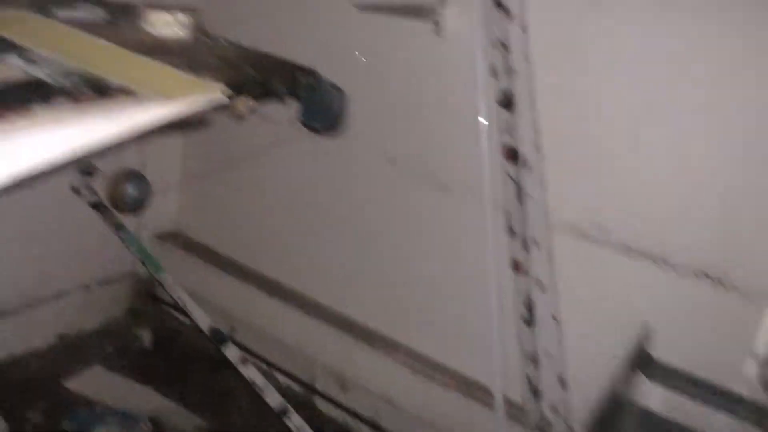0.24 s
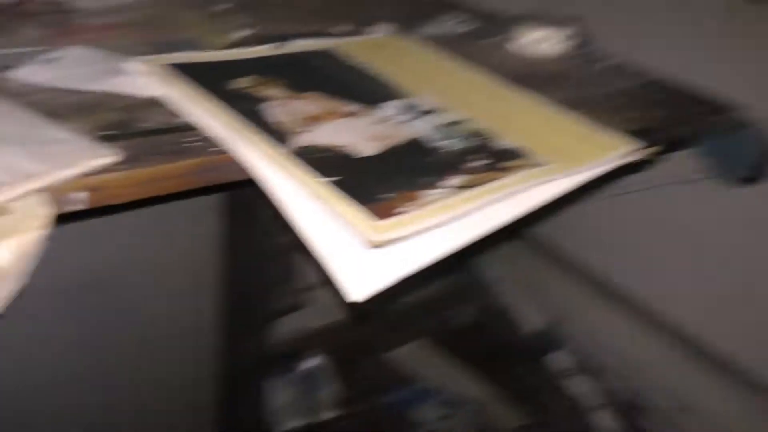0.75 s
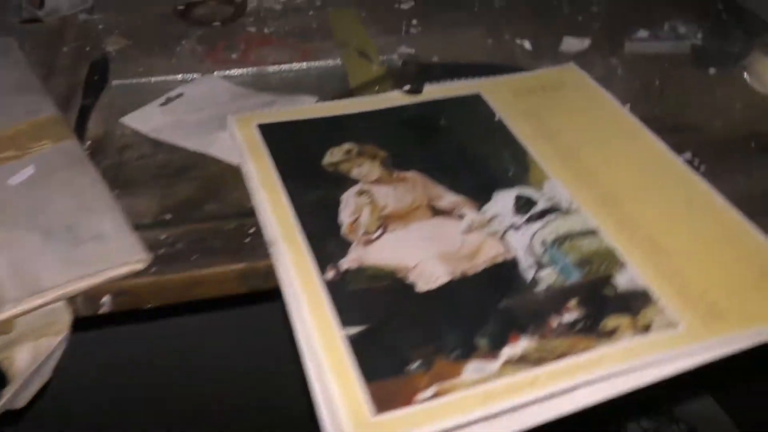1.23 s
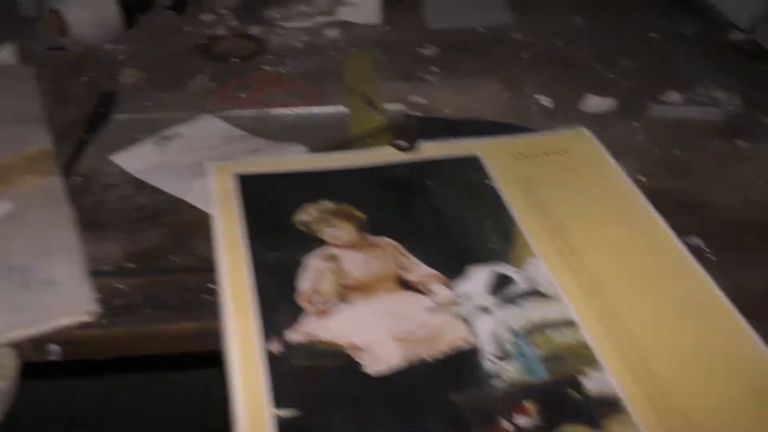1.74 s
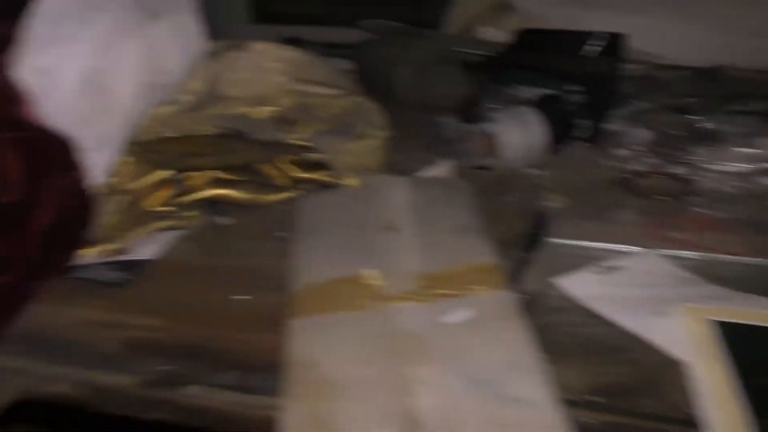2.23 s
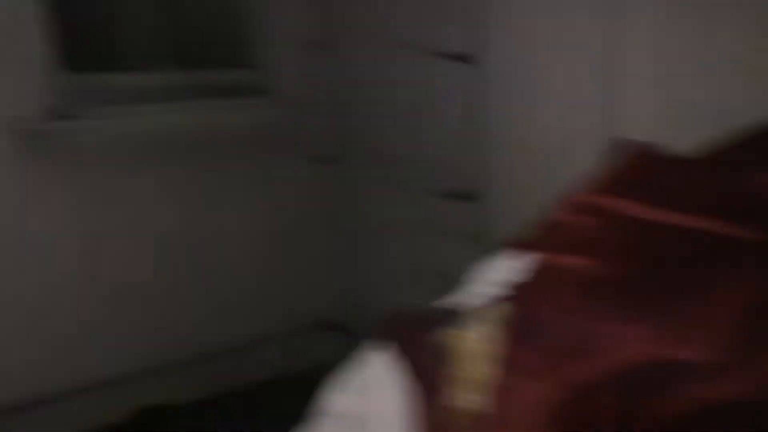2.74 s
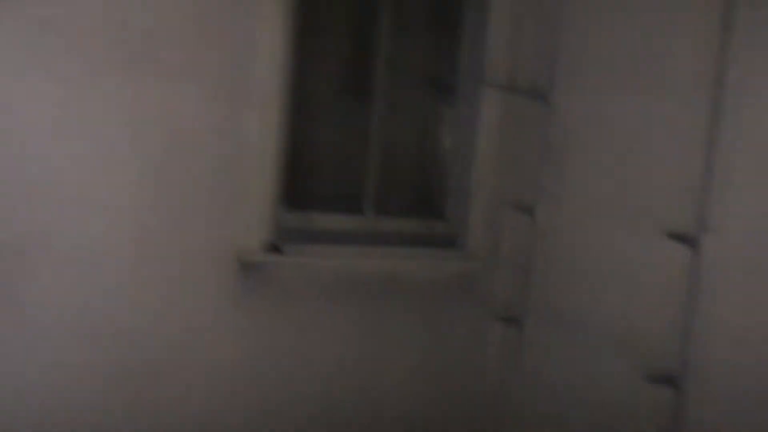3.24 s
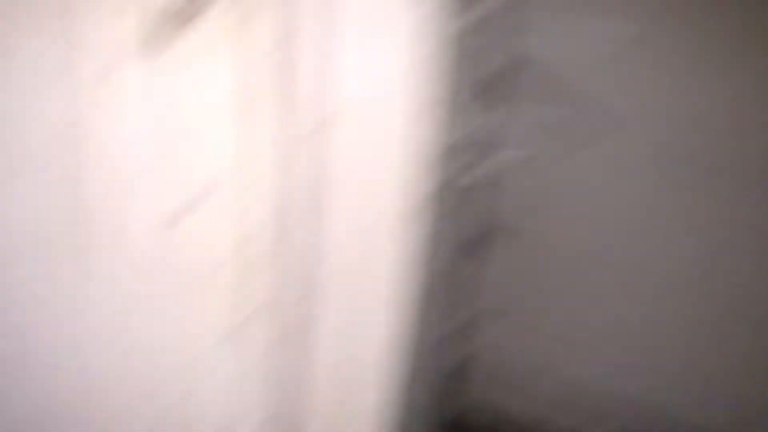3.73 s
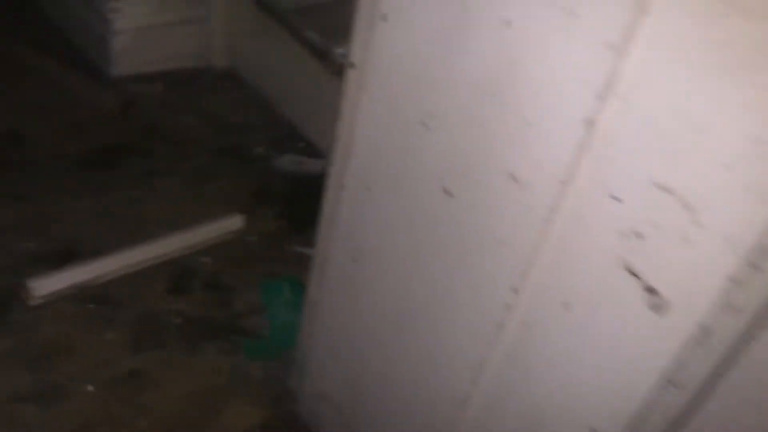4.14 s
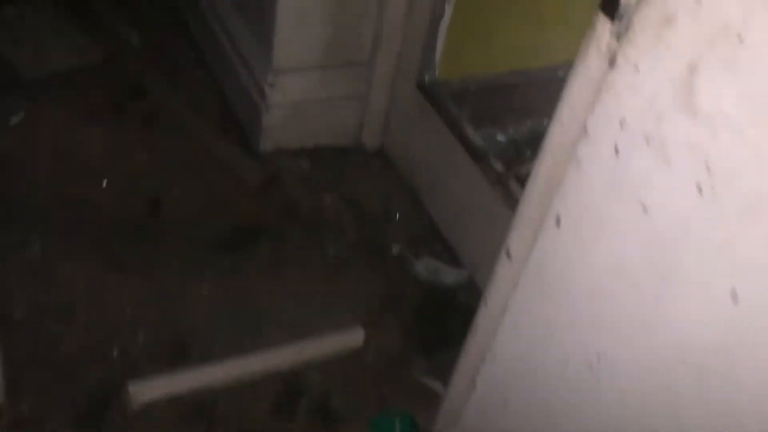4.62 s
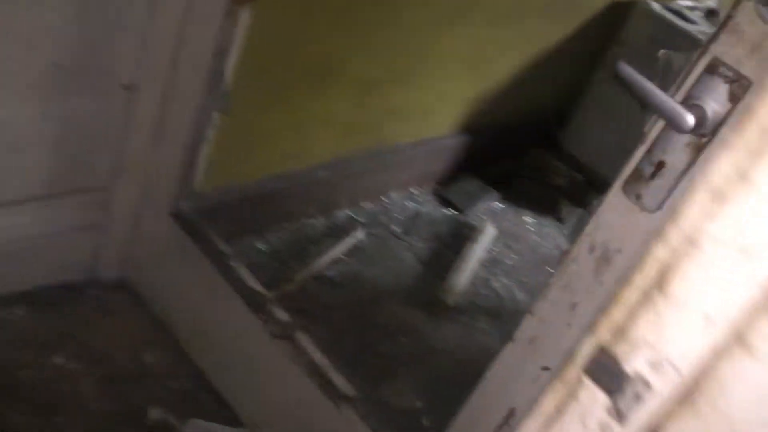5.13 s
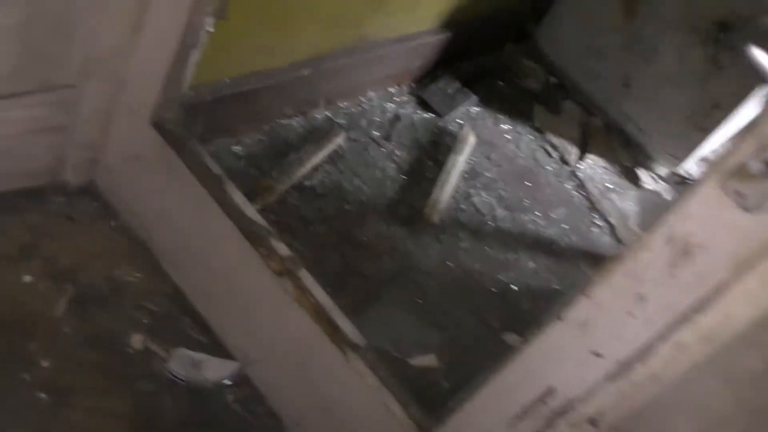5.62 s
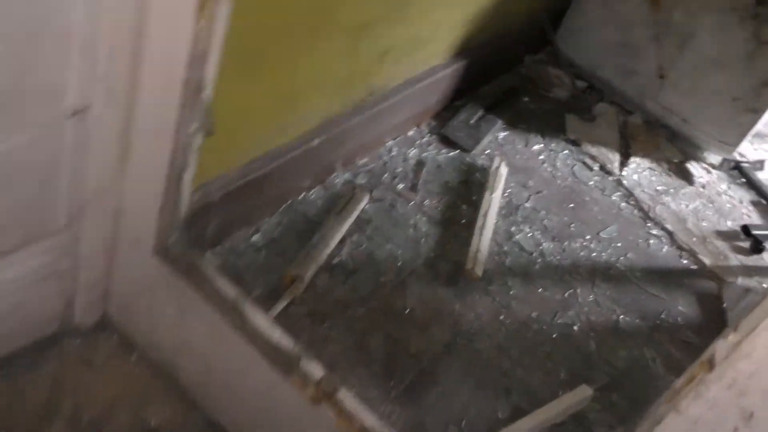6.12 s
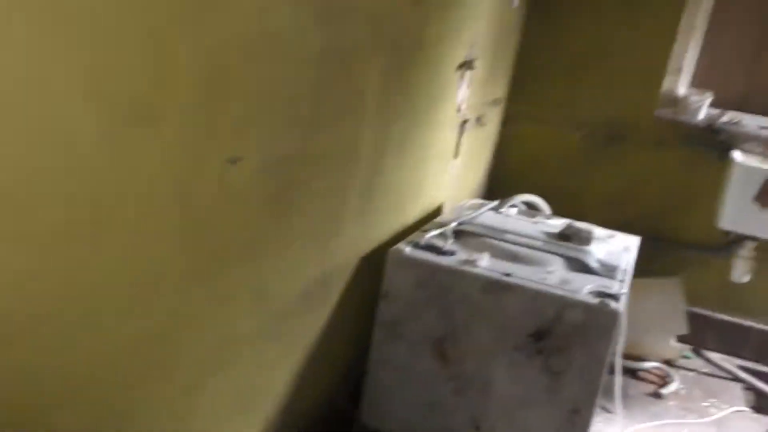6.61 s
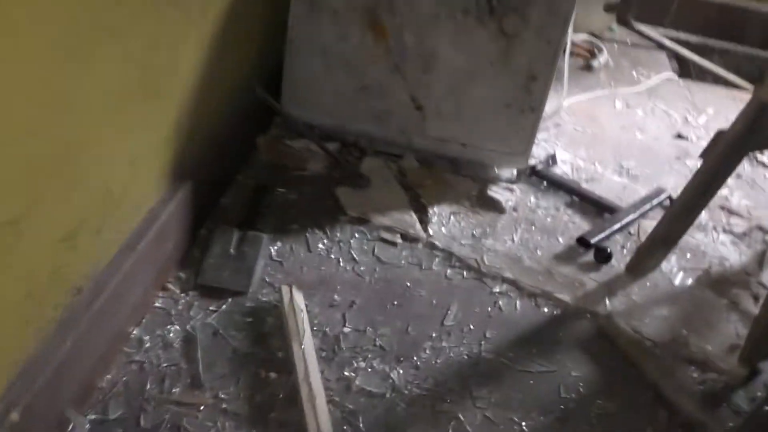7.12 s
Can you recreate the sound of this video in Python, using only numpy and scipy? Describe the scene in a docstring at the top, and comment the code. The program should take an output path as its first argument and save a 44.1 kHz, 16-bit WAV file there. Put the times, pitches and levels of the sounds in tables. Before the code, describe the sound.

In a bare, reverberant abandoned room, a few dull glass crunches sound further off, with faint clothing rustle, a bright cloth swipe and soft bumps on the handheld camera. After a quiet pause, glass begins to tick and scrape close to the stereo microphone, then snaps, grinds and clinks underfoot in a dense, bright crackle over a steady quiet hush.

```python
"""Broken glass grinds, snaps in quick bursts and clinks underfoot in the bare rooms of an abandoned house.
The holder of a hand-held camera crushes it close by: random clicks ring short, irregular modes.
Before that, someone crunches about further off, as duller filtered clicks with more room around them.
Cloth noise brushes the stereo microphone, knocks ring the camera case, air puffs at the ports,
and a steady coloured hush lies under it all."""
import sys
import numpy as np
from scipy import signal
from scipy.fft import rfft, irfft
from scipy.io import wavfile

SR = 44100
rng = np.random.default_rng(int(sys.argv[2]) if len(sys.argv) > 2 else 0)


def put_to_file(sound):
    """Save the sound as 16-bit audio at rate SR, in the file named by the first command-line argument."""
    columns = np.atleast_2d(sound).T  # one column per channel
    safe = np.clip(columns, -1, 1)
    whole_steps = np.round(safe * 32767)
    wavfile.write(sys.argv[1], SR, whole_steps.astype(np.int16))


N = 324576
TIME = np.arange(N) / SR
SHORT = TIME[:SR // 3]  # time axis of one brief sound

# Short snaps, ticks and knocks, mostly glass breaking close by, before a shared level trim.
# The burst length sets a bell-shaped fade; the note rings as a pair just below the listed pitch.
# (time [s], level [dB], burst length [s], centre of the snap [Hz], main note [Hz])
SNAPS_AND_TICKS = [(0.703, -41.5, 0.0035, 2500, 1240), (0.843, -40, .001, 2020, 1070),
                   (4.0477, -39, 0.0026, 1800, 1900), (4.969, -40.5, .009, 4000, 1820),
                   (5.006, -39.5, 0.0054, 3000, 1970), (5.075, -40.5, 0.0034, 9000, 11000),
                   (5.107, -42, .006, 3000, 1850), (5.183, -37, 0.027, 8000, 9100),
                   (5.214, -32.5, .012, 9000, 11700), (5.229, -37, 0.0028, 1430, 1710),
                   (5.2927, -26.5, 0.0018, 1470, 1540), (5.294, -29, 0.0072, 11300, 3610),
                   (5.448, -31, .008, 3000, 1120), (5.4576, -28, 0.0012, 1950, 2730),
                   (5.592, -37, 0.0036, 5000, 3500), (5.907, -29, 0.023, 1940, 13700),
                   (5.952, -30, 0.014, 3300, 4050), (6.044, -25.5, 0.0068, 3750, 4310),
                   (6.0761, -28.5, 0.011, 3480, 13600), (6.202, -23, .010, 5900, 5510),
                   (6.363, -28.5, 0.016, 7550, 6560), (6.4502, -21, 0.0069, 8500, 7200),
                   (6.4625, -21.5, 0.0025, 2320, 5920), (6.528, -30.5, 0.0089, 6000, 6250),
                   (6.559, -19, 0.0041, 6950, 9140), (6.606, -32, 0.021, 6760, 6900),
                   (6.8087, -20, 0.0063, 10500, 4080), (6.879, -30.5, 0.009, 8000, 4070),
                   (6.920, -26.5, 0.014, 8900, 3930), (6.979, -18.5, 0.01, 5200, 9800),
                   (7.041, -29.5, .007, 5000, 9860), (7.134, -23.5, 0.0019, 2780, 3840),
                   (7.175, -27, 0.013, 4000, 2280), (7.193, -23.5, .006, 9100, 9770),
                   (7.228, -22, 0.0065, 6740, 5410), (7.295, -35, .003, 1620, 1410)]
# Close: the holder's sole pressing on glass; the level steers both grit layers
# (start [s], end [s], level [dB])
SOLE_PRESSES = [(4.959, 5.505, -49), (5.923, 6.16, -38), (6.198, 6.407, -45.5), (6.503, 6.69, -42),
                (6.84, 6.946, -49), (6.95, 7.36, -34.5)]
# Tone of the coarse and the fine crushed glass: (frequency [Hz], relative level [dB])
COARSE_GRIT_TONE = [(200, 4.5), (600, -5), (1100, -0.5), (2200, 2.5), (3800, -8.5), (6000, -13.5),
                    (15000, -19)]
FINE_GRIT_TONE = [(1500, -13), (3500, 9), (5500, -1), (8000, 2.5), (11000, 1), (14000, -10), (16000, -23)]
# Close: a small loose piece that clinks: (mode [Hz], level [dB], decay by 60 dB [s])
SHARD_MODES = [(2570, 0, .1), (3200, -4, .12), (4400, -9, .08), (5220, -1, .14), (6218, 0, .3),
               (7750, -4, .14), (9470, -6, .08), (10480, -7, .14), (11980, -13, .1), (15350, -12, .1)]
# Short dull thuds, mostly the holder's treads: (time [s], level [dB])
SHORT_THUDS = [(0.844, -46.5), (4.048, -48), (4.944, -41), (5.226, -45), (5.457, -46.5), (6.08, -41.5),
               (6.462, -44.5), (6.965, -36.5), (7.18, -42.5)]
# Close: a shard dragged under the shoe: (start [s], end [s], level [dB])
SHARD_DRAGS = [(5.47, 5.62, -40), (5.608, 5.779, -44.5), (5.775, 5.867, -41.5)]
# Resonances of the dragged shard: (frequency [Hz], width [Hz], level [dB])
DRAG_RESONANCES = [(1117, 41, 0), (2640, 150, 0), (4310, 380, 3.5), (6200, 200, -5), (7060, 350, -8),
                   (9600, 400, 2.5), (11200, 500, -2), (13100, 700, -2)]
# Further off: steps on glass: (time [s], level [dB], fall [s], centre [Hz], thud of the boards [dB])
FAR_STEPS = [(0.088, -38, 0.023, 2000, -54), (0.653, -51, 0.0052, 1760, -57),
             (0.924, -28.5, 0.022, 3200, -46.5), (1.087, -25, 0.013, 2220, -38.5),
             (1.305, -43.5, 0.047, 2680, -60), (1.996, -45, 0.011, 9500, -68),
             (2.773, -27.5, 0.0096, 3200, -37), (2.985, -29.5, 0.014, 2330, -37.5),
             (3.05, -26.5, 0.039, 1980, -39), (4.046, -42, 0.011, 1730, -64)]
# Further off: a larger loose piece on the floor: (mode [Hz], level [dB], decay by 60 dB [s])
PANE_MODES = [(1670, -3, .06), (2150, -7, .05), (2480, -3, .07), (2910, -7, .05), (3660, -7, .1),
              (3990, -1, .1), (5215, -4, .28), (6540, -14, .1), (9810, -15, .12)]
# Further off: feet shifting: (start [s], end [s], level [dB])
FOOT_SHUFFLES = [(0.0, 0.09, -54), (0.27, 0.52, -61.5), (1.70, 1.77, -58), (3.88, 4.30, -55),
                 (4.47, 4.60, -60.5)]
# The bare room: (frequency [Hz], decay by 60 dB [s])
ROOM_DECAY = [(150, 1), (400, 0.98), (1000, 0.63), (3000, 0.45), (7000, 0.43), (14000, 0.4)]
# At the microphone: cloth flicking past, before a shared level trim
# (time [s], level [dB], swell [s], fall [s])
CLOTH_FLICKS = [(0.703, -35.5, 0.0011, .005), (0.843, -30.5, 0.00078, 0.002), (1.156, -33, .004, .005),
                (1.997, -43, .001, .001), (2.362, -51, 0.0011, .003), (3.713, -18.5, 0.03, 0.01),
                (4.840, -43.5, 0.00085, 0.0018), (5.869, -40.5, .001, 0.0024)]
# Close: clothes rustling: (start [s], end [s], level [dB])
CLOTH_RUSTLES = [(0.28, 0.44, -59.5), (0.74, 0.93, -52.5), (1.89, 2.20, -56), (2.61, 2.67, -52),
                 (4.17, 4.30, -51), (4.37, 4.45, -56.5), (4.49, 4.69, -56.5)]
# Tone of the rustling: (frequency [Hz], relative level [dB])
CLOTH_TONE = [(2000, 0), (3500, -2), (5000, -3), (9200, -2), (11000, -1), (14000, -6), (16000, -25)]
# On the camera body: dull bumps: (time [s], strength of the knock [dB])
CAMERA_BUMPS = [(2.591, -19), (2.613, -18), (2.70, -24), (2.727, -21.5), (2.758, -17.5), (2.778, -19),
                (2.787, -21)]
# At the microphone ports: puffs of air: (start [s], end [s], level [dB])
AIR_PUFFS = [(0.84, 0.87, -46.5), (1.09, 1.20, -55), (2.58, 2.87, -45), (2.85, 3.20, -52.5),
             (3.755, 3.83, -44.5)]
# Tone of the background hush: (frequency [Hz], relative level [dB])
HUSH_TONE = [(15, -40), (25, -10), (118, 0), (298, -4), (371, -2), (606, -15), (817, -9), (912, -4),
             (1850, -7), (2060, -9), (2570, -7), (3460, -9), (4310, -17), (15100, -20), (16800, -43)]
# Stereo width of the microphone pair: (frequency [Hz], side gain [dB])
STEREO_WIDTH = [(60, 5), (150, 3.5), (350, 2.5), (1200, 4.5), (4400, 2.5), (8100, -2), (14000, 1)]

# Each snap or tick is echoed by weaker ones: mean gap, drop of the first, further drop of the next, length
AGAIN_GAP_S, AGAIN_DB, AGAIN_FADE_DB, AGAIN_LENGTH_S = 0.021, -13.5, -4, 0.0045
# More weight grinds finer: coarse grit takes up only a share of the rise above a light press
LIGHT_PRESS_DB, COARSE_LIGHT_DB, COARSE_FOLLOWS = -48, -45.5, 0.29
PRESS_ATTACK_S, PRESS_RELEASE_S = 0.03, 0.076
# In each far step the heel touches first, softer and brighter, and then the sole crushes the glass
HEEL_DB, HEEL_SWELL_S, HEEL_FALL_S, HEEL_BRIGHTER = -6.5, 0.0039, 0.0095, 1.2
SOLE_LAG_S, SOLE_SWELL_S = 0.011, 0.0045
# Thuds of the far steps, and the short thuds
FAR_THUD_FALL_S, FAR_THUD_HZ = 0.047, 210
SHORT_THUD_FALL_S, SHORT_THUD_HZ = 0.0085, 285
# One faint squeak further off; its level is set before a random flutter
SQUEAK_S, SQUEAK_LENGTH_S, SQUEAK_HZ, SQUEAK_DB, SQUEAK_ATTACK_S = 2.355, 0.45, 2760, -56, 0.021
CUTOFF_HZ = 16000  # top of the recorded band


def snap_bursts(count=2, uneven=0.35, scatter_db=2.0, note_spread=0.15):
    """Each snap or tick, then weaker ones at uneven gaps, ringing near its note as pieces of a shard do."""
    for s, db, length, centre_hz, note_hz in SNAPS_AND_TICKS:
        yield s, db, length, centre_hz, note_hz
        for k, (late, luck, piece) in enumerate(rng.uniform(-1, 1, (count, 3))):
            s = s + AGAIN_GAP_S * (1 + uneven * late)
            if s < TIME[-1]:
                again_db = db + AGAIN_DB + k * AGAIN_FADE_DB + scatter_db * luck
                yield s, again_db, AGAIN_LENGTH_S, centre_hz, note_hz * np.exp(note_spread * piece)


def snaps_and_ticks(per_s=3200, spread_db=2.0, first_db=3, body_db=-2, note_db=-5, body_t60=0.0091,
                    note_t60=0.0065, low_hz=850, width=1.92, side_db=-12,
                    crumb_db=-19, crumb_fall=0.017, crumbs_per_s=700, trim_db=2.0):
    """Like a fracture: a burst of tiny jumps, then settling crumbs, all ringing short, irregular modes."""
    out = np.zeros((2, N))
    for s, db, length, centre_hz, note_hz in snap_bursts():
        jumps = grains(per_s, spread_db, size=len(SHORT)) * np.exp(-(SHORT / length / 1.5) ** 2)
        jumps[0] = from_db(first_db)
        crumbs = grains(crumbs_per_s, 2.7, size=len(SHORT)) * stroke(0.0015, crumb_fall)
        jumps += from_db(crumb_db) * crumbs
        # one mode in every thousand hertz, at an uneven place
        modes = 1000 * (np.arange(1, 16) + rng.uniform(-0.3, 0.7, 15))
        body = np.array([ring(jumps, hz, body_t60 * rng.uniform(0.24, 2.7)) for hz in modes])
        mid = rms_one(jumps) + from_db(body_db) * rms_one(body.sum(axis=0))
        side = rms_one(rng.standard_normal(len(modes)) @ body)
        band = [centre_hz / width, centre_hz * width]
        snap, spread = cut(cut(np.array([mid, side]), band, "band", order=1), low_hz, "high")
        # the main note is a close pair of quickly damped modes
        note = ring(jumps, note_hz * 0.98, note_t60) - ring(jumps, note_hz * 0.94, note_t60)
        centre = rms_one(snap) + from_db(note_db) * rms_one(note)
        add(out, s, at_level(widen(centre, rms_one(spread), side_db), db + trim_db))
    return out


def press(start, end):
    """Weight comes onto the sole, stays and lifts."""
    onset = np.clip((TIME - start) / PRESS_ATTACK_S, 0, 1)
    return onset * np.exp(-np.clip((TIME - end) / PRESS_RELEASE_S, 0, 20))


def splinters(spectrum, per_s, spread_db, cycles):
    """Each splinter that pops rings briefly at one of 28 pitches, dealt at random."""
    pops, pitches = grains(per_s, spread_db, size=N), np.geomspace(900, 15500, 28)
    dealt = rng.integers(0, len(pitches), N)
    total = 0
    for k, hz in enumerate(pitches):
        total = total + rms_one(ring(pops * (dealt == k), hz, cycles / hz)) * np.sqrt(hz)
    return colour(total, spectrum)


def grit(coarse_db=-7.5, fine_db=-6):
    """Crushed glass crackles under the sole as the weight rolls over it."""
    coarse = splinters(COARSE_GRIT_TONE, per_s=3500, spread_db=7.0, cycles=9.3)
    fine = splinters(FINE_GRIT_TONE, per_s=6000, spread_db=4.0, cycles=17)
    out = 0
    for start, end, db in SOLE_PRESSES:
        rough_db = COARSE_LIGHT_DB + COARSE_FOLLOWS * (db - LIGHT_PRESS_DB)
        ground = from_db(rough_db + coarse_db) * coarse + from_db(db + fine_db) * fine
        out = out + press(start, end) * ground
    return out


def clink(modes, s, db, fall):
    """A loose piece chatters on the floor and rings freely."""
    out, contacts = np.zeros(N), np.zeros(SR)
    contacts[:len(SHORT)] = grains(1200, 4.7, size=len(SHORT)) * stroke(0.002, fall)
    ringing = sum(from_db(mode_db) * rms_one(ring(contacts, hz, t60)) for hz, mode_db, t60 in modes)
    add(out, s, at_level(ringing, db))
    return out


def scrapes(hiss_db=-1):
    """Fast stick and slip hisses and drives the dragged shard's broad resonances."""
    slips = grains(5000, 3.5, size=N)
    tone = 0
    for hz, width, db in DRAG_RESONANCES:
        t60 = np.log(1000) / np.pi / width  # a broader resonance dies sooner
        tone = tone + from_db(db) * rms_one(ring(slips, hz, t60))
    hiss = rms_one(cut(grains(5000, 2.2, size=N), [1000, 14500], "band"))
    return swells(SHARD_DRAGS) * rms_one(rms_one(tone) + from_db(hiss_db) * hiss)


def thud_settings():
    """Far steps thud long and low, in step with their crunch; the other thuds are short."""
    for s, *_, thud_db in FAR_STEPS:
        yield s + SOLE_LAG_S, thud_db, FAR_THUD_FALL_S, FAR_THUD_HZ
    for s, db in SHORT_THUDS:
        yield s, db, SHORT_THUD_FALL_S, SHORT_THUD_HZ


def thuds(width=1.68):
    """Dull thuds, mostly boards under a step: each a short stroke of band-limited noise."""
    out = np.zeros(N)
    for s, db, fall, hz in thud_settings():
        blow = rng.standard_normal(len(SHORT)) * stroke(0.0026, fall)
        add(out, s, at_level(cut(blow, [hz / width, hz * width], "band"), db))
    return out


def heel_and_sole():
    """The two contacts of each far step."""
    for s, db, fall, centre_hz, _ in FAR_STEPS:
        yield s, db + HEEL_DB, HEEL_SWELL_S, HEEL_FALL_S, min(centre_hz * HEEL_BRIGHTER, SR / 4)
        yield s + SOLE_LAG_S, db, SOLE_SWELL_S, fall, centre_hz


def crunches(per_s=2500, spread_db=3.5, low_hz=1000, width=1.585, dull_hz=11000):
    """Heel and sole each crush many splinters at once, and distance dulls them."""
    out = np.zeros(N)
    for s, db, swell, fall, centre_hz in heel_and_sole():
        crush = grains(per_s, spread_db, size=len(SHORT)) * stroke(swell, fall)
        crush = cut(crush, [centre_hz / width, centre_hz * width], "band", order=1)
        crush = cut(crush, low_hz, "high", order=3)
        add(out, s, at_level(cut(crush, dull_hz, "low", order=1), db))
    return out


def shuffles():
    """Feet shifting on glass further off: dense clicks that rise and ebb."""
    return swells(FOOT_SHUFFLES) * colour(grains(3000, 5.9, size=N), COARSE_GRIT_TONE)


def squeak(waver_hz=125):
    """A thin rubbing note, unsteady in pitch and fluttering in level."""
    waver, grip = (rms_one(cut(rng.standard_normal(N), 230, "low")) for _ in range(2))
    pitch = SQUEAK_HZ + waver_hz * waver
    rise_and_fade = np.interp(TIME - SQUEAK_S, [0, SQUEAK_ATTACK_S, SQUEAK_LENGTH_S], [0, 1, 0])
    return from_db(SQUEAK_DB) * rise_and_fade * grip * np.sin(2 * np.pi * np.cumsum(pitch) / SR)


def room(x, side_db, build):
    """Bare plaster walls: dense reflections that build up and die sooner in the treble; unit energy."""
    t, edges = TIME[:SR], np.geomspace(60, 18000, 13)
    white, tail = rng.standard_normal((2, 2, SR)), 0
    for k, band in enumerate(zip(edges, edges[1:])):
        t60 = at_hz(ROOM_DECAY, np.sqrt(np.prod(band)))
        # neighbouring bands use different noise
        tail = tail + cut(white[k % 2], band, "band") * from_db(-60 * t / t60)
    tail = widen(*tail, side_db) * (1 - np.exp(-t / build))
    return signal.fftconvolve(x[None], rms_one(tail) / np.sqrt(SR), axes=1)[:, :N]


def brushes(low_hz=2200, sheen_hz=10800, sheen_db=-6, trim_db=-4.5):
    """Fibres slip past the microphone in a dry, bright swish."""
    out = np.zeros((2, N))
    for s, db, swell, fall in CLOTH_FLICKS:
        slips = widen(*rng.standard_normal((2, len(SHORT))), -7.5) * stroke(swell, fall)
        swish = rms_one(cut(slips, [low_hz, 13500], "band"))
        sheen = rms_one(ring(slips, sheen_hz, 0.00072))
        add(out, s, at_level(swish + from_db(sheen_db) * sheen, db + trim_db))
    return out


def rustles(side_db=-10):
    """Clothes close by: very dense clicks, bright and a little spread, that rise and ebb."""
    mid, side = (colour(grains(9000, 3.1, size=N), CLOTH_TONE) for _ in range(2))
    return swells(CLOTH_RUSTLES) * widen(mid, side, side_db)


def bumps(case_hz=270, case_t60=0.023, soft_hz=480, rumble_db=-18, tick_db=-21, tick_hz=1080):
    """Soft knocks ring the camera case briefly, tick faintly and leave a low rumble."""
    knocks = np.zeros(N)
    for s, db in CAMERA_BUMPS:
        add(knocks, s, from_db([db]))
    thud = cut(ring(knocks, case_hz, case_t60), soft_hz, "low", order=3)
    tick = ring(knocks, tick_hz, 0.036) + 0.5 * ring(knocks, 2170, 0.029)
    shake = widen(*rng.standard_normal((2, len(SHORT))), -15.0)
    shake = cut(shake, [110, 380], "band", order=3) * stroke(0.0039, 0.059)
    rumble = signal.fftconvolve(knocks[None], rms_one(shake) / 4, axes=1)[:, :N]
    return 0.97 * thud + from_db(tick_db) * tick + from_db(rumble_db) * rumble


def puffs(low_hz=48, high_hz=115):
    """Moving air rumbles in each port separately."""
    return swells(AIR_PUFFS) * rms_one(cut(rng.standard_normal((2, N)), [low_hz, high_hz], "band"))


def air(level_db=-59, side_db=-6):
    """Steady hush of the empty house and the microphone."""
    mid, side = (colour(cut(rng.standard_normal(N), 44, "high"), HUSH_TONE) for _ in range(2))
    return from_db(level_db) * widen(mid, side, side_db)


def from_db(db):
    """Decibels to gain."""
    return 10 ** (np.asarray(db) / 20)


def rms_one(x):
    """Scale to rms 1."""
    return x / np.sqrt(np.mean(x ** 2) + 1e-20)


def at_level(x, db):
    """Give a short sound the energy of ten milliseconds at this level."""
    return x * from_db(db) * np.sqrt(SR / 100 / (np.sum(x ** 2) + 1e-20))


def at_hz(points, hz):
    """Read a table on a log-frequency axis."""
    table = np.array(points)
    return np.interp(np.log(np.maximum(hz, 1)), np.log(table[:, 0]), table[:, 1])


def cut(x, hz, kind, order=2):
    """Butterworth filter."""
    sections = signal.butter(order, np.clip(hz, 10, 0.45 * SR), kind, fs=SR, output="sos")
    return signal.sosfilt(sections, x + 1e-18)


def tilt(x, spectrum):
    """A gentle tone curve."""
    gain = from_db(at_hz(spectrum, np.fft.rfftfreq(2 * N, 1 / SR)))
    return irfft(rfft(x, 2 * N) * gain)[:N]


def colour(x, spectrum):
    """Shape a steady sound; rms 1."""
    return rms_one(tilt(x, spectrum))


def ring(x, hz, t60):
    """One decaying mode, 60 dB down after t60 seconds."""
    r, w = from_db(-60 / (t60 * SR)), 2 * np.pi * hz / SR
    return signal.lfilter([0, np.sin(w)], [1, -2 * r * np.cos(w), r * r], x + 1e-18)


def add(track, s, sound):
    """Mix a sound in at a time."""
    start = max(round(s * SR), 0)
    track[..., start:start + sound.shape[-1]] += sound[..., :N - start]


def grains(per_s, spread_db, size):
    """Random clicks, many small and a few large."""
    chance, strength = rng.random(size), rng.exponential(1, size)
    sign = rng.choice([-1, 1], size)
    return (chance < per_s / SR) * sign * from_db(spread_db * np.minimum(strength, 4))


def stroke(swell, fall):
    """Pressure builds, then dies away."""
    return np.minimum(SHORT / swell, 1) * np.exp(-np.maximum(SHORT - swell, 0) / fall)


def swells(rows):
    """Each movement rises and ebbs in one rounded arch."""
    level = 0
    for start, end, db in rows:
        progress = np.clip((TIME - start) / (end - start), 0, 1)
        level = level + from_db(db) * np.sqrt(np.abs(np.sin(np.pi * progress)))
    return level


def widen(mid, side, side_db):
    """Left and right from a common and an opposed part."""
    return mid + from_db(side_db) * side * np.array([[1], [-1]])


def scene():
    """Snaps and grit are mostly direct; far glass comes about as strongly off the walls as directly."""
    snaps = snaps_and_ticks()
    direct = grit() + clink(SHARD_MODES, 7.229, -24, 0.0066) + thuds()
    far = crunches() + clink(PANE_MODES, 2.987, -25.5, 0.041) + shuffles() + squeak()
    direct_room = from_db(-5) * room(snaps.mean(axis=0) + direct, side_db=-6.5, build=0.0023)
    far_room = room(far, side_db=-9.5, build=0.00071)
    steps = snaps + direct + scrapes() + direct_room + from_db(0.5) * far + far_room
    return steps + brushes() + rustles() + bumps() + puffs() + air()


def record(dry, hollow_hz=665, hollow_q=2.5, depth=0.4, top=0.93):
    """The small microphones are hollow in the low middle; peaks are rounded and the top is cut."""
    side = tilt((dry[0] - dry[1]) / 2, STEREO_WIDTH)
    ports = widen(dry.mean(axis=0), side, 0)
    ports = ports - depth * signal.lfilter(*signal.iirpeak(hollow_hz, hollow_q, fs=SR), ports)
    rounded = top * np.tanh(ports / top)
    return signal.sosfilt(signal.ellip(10, 0.1, 80, CUTOFF_HZ, fs=SR, output="sos"), rounded)


dry = scene()
out = record(dry)
put_to_file(out)
```